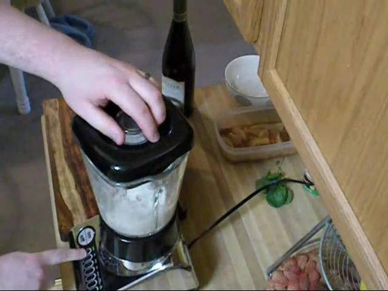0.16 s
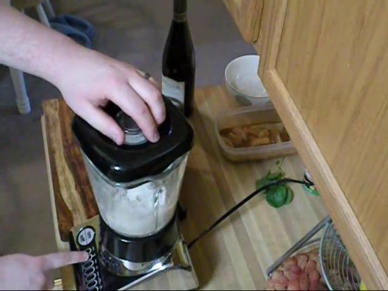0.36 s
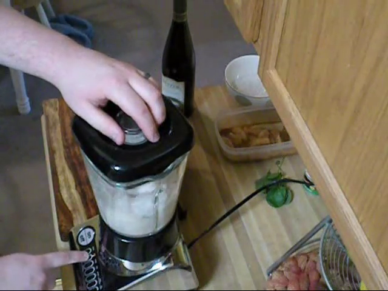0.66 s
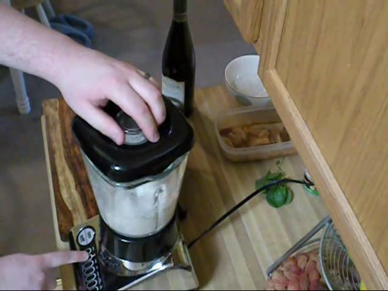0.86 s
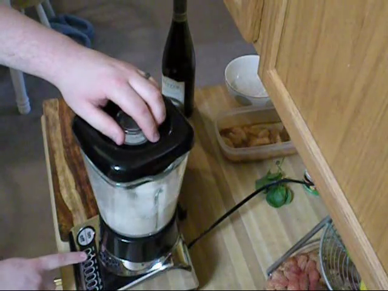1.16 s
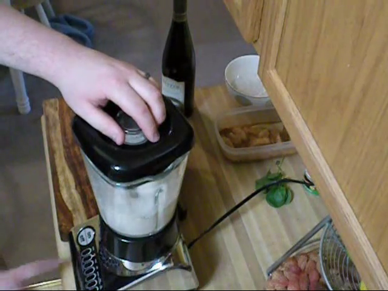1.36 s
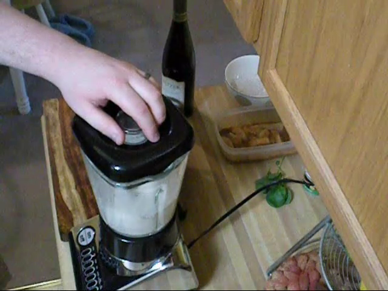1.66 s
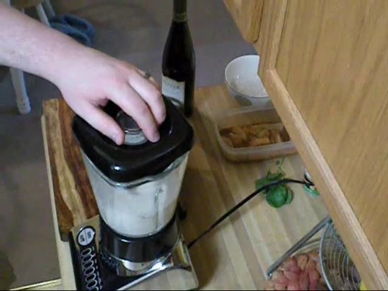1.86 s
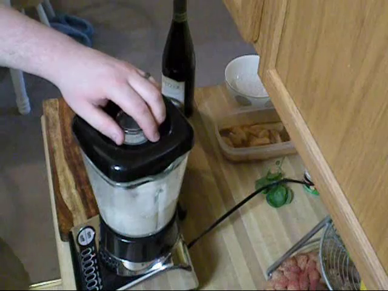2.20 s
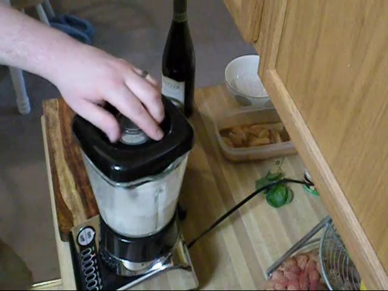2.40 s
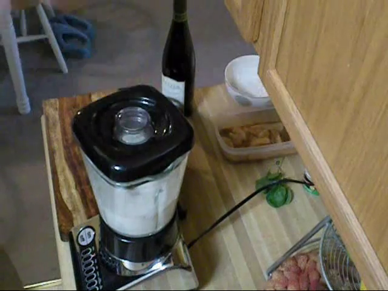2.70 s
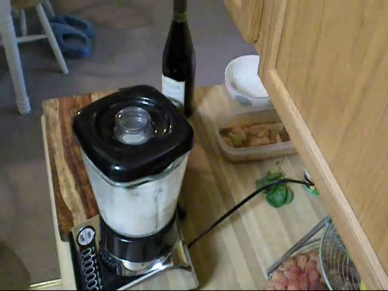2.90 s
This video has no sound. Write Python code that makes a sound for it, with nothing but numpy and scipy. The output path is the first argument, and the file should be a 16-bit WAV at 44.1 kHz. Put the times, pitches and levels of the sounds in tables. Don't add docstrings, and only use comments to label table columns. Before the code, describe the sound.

A blender sits quiet with faint plastic creaks, then a sharp button click starts its buzzing, rising whine; chunks rattle against the glass in a small kitchen, caught by a cheap, gritty camera microphone.

```python
import sys
import numpy as np
from scipy import signal
from scipy.fft import rfft, irfft
from scipy.io import wavfile
from scipy.ndimage import uniform_filter1d, map_coordinates

SR = 44100
rng = np.random.default_rng(int(sys.argv[2]) if len(sys.argv) > 2 else 0)


def dump_mix(stems):
    frames = np.atleast_2d(stems).T
    limited = np.clip(frames, -1, 1)
    pcm = np.round(limited * 32767).astype(np.int16)
    wavfile.write(sys.argv[1], SR, pcm)


def decibels_to_gain(level_db):
    exponent = np.asarray(level_db, float) / 20
    return 10 ** exponent


N = 134505
MAINS2_HZ = 120


def col(table, k, at, log=False):
    a = np.array(table, float)
    if log:
        return np.interp(np.log(at), np.log(a[:, 0]), a[:, k])
    return np.interp(at, a[:, 0], a[:, k])


def level(x, db):
    return x * decibels_to_gain(db) / np.sqrt(np.mean(x ** 2))


def walk(rate):
    k = int(SR / rate)
    held = np.repeat(rng.standard_normal(N // k + 1), k)
    return 1.035 * uniform_filter1d(uniform_filter1d(held, k), k)[:N]


def peak(x, hz, width):
    return signal.lfilter(*signal.iirpeak(min(hz, 4200), hz / width, SR), x)


def bands(table, slow_db, quick_db):
    f = np.arange(N // 2 + 1) * SR / N + 1
    swell = walk(6.37)
    noise = rfft(rng.standard_normal(N)) * decibels_to_gain(col(table, 1, f, True)) * (f < 4300)
    out = 0
    for hz in 40 * 2 ** np.arange(0, 7, .5):
        share = np.cos(np.clip(np.log2(f / hz) * np.pi, -np.pi / 2, np.pi / 2)) ** 2
        out = out + irfft(noise * share, N) * decibels_to_gain(slow_db * swell + quick_db * walk(20))
    return level(out, 0)


# f/Hz, level/dB (per Hz)
KITCHEN = [(29, -42), (50, -29.5), (296, -9), (330, -15.5), (362, -2.5), (412, -14.5), (443, -10),
           (2180, -19), (4000, -22.5), (5200, -53), (8800, -120)]


def kitchen():
    return decibels_to_gain(-46) * bands(KITCHEN, 1.9, 2.0)


# t/s, level/dB, length/s, f/Hz
HANDLING = [
    (.0701, -32.5, 0.01, 886),
    (.0702, -30, 0.011, 3050),
    (0.081, -40, 0.017, 2500),
    (.345, -44, .04, 2510),
    (0.522, -44, 0.0087, 1520),
    (0.564, -44.5, 0.046, 1090),
    (0.5715, -34.5, 0.017, 3540),
    (.618, -19, 0.012, 1960),
    (0.621, -12.5, 0.011, 2900),
    (0.624, -23, 0.011, 194),
]


def handling(t):
    out = np.zeros(N)
    for s, db, length, hz in HANDLING:
        u = np.clip(t - s, 0, None) / length
        grit = rng.standard_normal(N) * decibels_to_gain(4 * walk(600))
        burst = level(peak(grit, hz, .5 * hz), db)
        out += burst * (t > s) * np.minimum(u * 6, 1) * np.exp(-u)
    return out


# t/s, level/dB, rise/s, f/Hz
JOLTS = [(0.0724, -32.5, .003, 900), (0.6197, -6, 0.00079, 2880), (0.621, -12, .002, 3626),
         (.629, -12, 0.0049, 650), (0.6454, -10.5, 0.0049, 650), (0.666, -18.5, 0.0058, 650),
         (0.704, -13.5, .008, 640), (0.801, -13.5, .012, 645), (0.857, -13, 0.015, 661),
         (0.866, -15, 0.014, 1508), (0.938, -9.5, 0.0068, 660), (1.301, -15, 0.022, 1487)]


def jolts(t):
    out = np.zeros(N)
    for s, db, rise, hz in JOLTS:
        u = np.clip(t - s, 0, None) / rise
        turns = hz * t + rng.random()
        out += decibels_to_gain(db) * u * np.exp(1 - u) * np.sin(2 * np.pi * turns)
    return out


# f/Hz, width/Hz, level/dB
HOUSING = [(1186, 30, -6), (1232, 30, -13), (1305, 44, -4), (1403, 30, -.5), (1448, 36, 4.5),
           (1506, 36, 2.5), (1550, 24, .5), (1590, 24, -6), (1660, 80, -11)]


def housing(x):
    out = 0
    for hz, width, db in HOUSING:
        out = out + decibels_to_gain(db) * peak(peak(x, hz, 1.25 * width), hz, 1.25 * width)
    return out


# t/s, f/Hz, level/dB
WHINE = [(.64, 1310, -33), (.86, 1322, -29), (1.0, 1365, -28), (1.1, 1386, -23), (1.22, 1396, -23),
         (1.3, 1390, -25), (1.48, 1436, -21), (1.64, 1462, -22), (1.88, 1515, -20), (2.04, 1519, -20),
         (2.2, 1544, -20), (2.44, 1555, -20), (2.6, 1550, -20), (2.76, 1577, -19), (2.86, 1590, -20),
         (2.92, 1580, -19), (3.05, 1572, -19)]
# steps of twice the mains rate, level/dB
SIDEBANDS = [
    (-4, -14),
    (-3, -2),
    (-2, 0),
    (-1, 0),
    (0, 0),
    (1, -2),
    (2, -7),
]
# multiple of twice the mains rate, level/dB
BUZZ = [
    (1, -89.5),
    (2, -30),
    (3, -28.5),
    (5, -32.5),
    (7, -32),
]


def motor(t):
    hz = col(WHINE, 1, t) * (1 + 0.00093 * walk(30))
    turn = 2 * np.pi * np.cumsum(hz) / SR
    mains = 2 * np.pi * MAINS2_HZ * t
    whine = 0
    for k, db in SIDEBANDS:
        start = 2 * np.pi * rng.random()
        whine = whine + decibels_to_gain(db + 3.2 * walk(14)) * np.sin(turn + round(k) * mains + start)
    out = housing(decibels_to_gain(col(WHINE, 2, t)) * whine)
    brushes = rng.standard_normal(N)
    out += level(housing(brushes), -23.5)
    shaft = np.sin((turn - 2 * mains) / 12)
    out += decibels_to_gain(-41) * peak(shaft, 101, 6.5)
    for k, db in BUZZ:
        start = 2 * np.pi * rng.random()
        out += decibels_to_gain(db - 2.5 + 3.3 * walk(14)) * np.sin(round(k) * mains + start + 0.98 * walk(8))
    return out


def rings(table, push):
    out = 0
    for k, (hz, width, db) in enumerate(table):
        ring = level(peak(peak(push, hz, 1.37 * width), hz, 1.37 * width), 0)
        out = out + decibels_to_gain(db + 1.2 * walk(13)) * ring * (-1) ** k
    return out


# f/Hz, width/Hz, level/dB
JAR = [(230, 22.3, -4.5), (280.7, 31, -6.5), (388.5, 130, -1.5), (565, 46, -9.5), (613.4, 72, -2.5),
       (670.3, 50, -1.5), (899, 120, -2)]
# f/Hz, level/dB (per Hz)
CHURN = [(35, -53), (60, -44), (232, -6.5), (494, -9), (621, 5.5), (780, -5), (1470, -5), (1720, -7.5),
         (4000, -8.5), (5200, -19), (8800, -120)]
# f/Hz, width/Hz, level/dB
SPLASH = [(1849, 52, -10), (2277, 110, -8.5), (2720, 160, -6), (3612, 380, -2.5)]
# t/s, churn level/dB, rumble level/dB, knocking level/dB
LOAD = [
    (.62, -31.5, -18, -15),
    (.72, -27.5, -20.5, -3),
    (.76, -25, -22.5, 12),
    (.86, -24.5, -17.5, 3),
    (1.0, -20.5, -19.5, 6.5),
    (1.25, -21.5, -19.5, 3),
    (1.6, -20, -21, 5.5),
    (2, -19, -20.5, -4),
    (2.6, -21, -25, 3),
    (3.05, -21, -21.5, -0.5),
]


def mix(t):
    pulse = 1 + 0.13 * np.sin(2 * np.pi * MAINS2_HZ * t)
    push = rng.standard_normal(N) * decibels_to_gain(3.2 * walk(39.92)) * pulse
    rumble = level(rings(JAR, push), 0)
    churn = bands(CHURN, 0.23, 1.5) + decibels_to_gain(-7) * rings(SPLASH, push)
    return rumble * decibels_to_gain(col(LOAD, 2, t)) + churn * decibels_to_gain(col(LOAD, 1, t))


# t/s, peak level/dB
CHUNKS = [(0.7288, -18), (0.7472, -16), (0.7622, -14), (0.7916, -16), (0.8301, -14), (0.9667, -17),
          (1.0461, -13), (1.074, -16), (1.092, -16), (1.1344, -15), (1.1688, -16), (1.1917, -16),
          (1.2157, -15), (1.4137, -21), (1.4267, -17), (1.4586, -15), (1.5459, -16), (1.5908, -16),
          (1.723, -19), (1.7804, -15), (1.9375, -19), (2.0074, -18), (2.0653, -16), (2.1511, -17),
          (2.2753, -18), (2.4404, -20), (2.6145, -17), (2.7238, -16), (2.9916, -19), (3.0161, -15)]
# f/Hz, level/dB, t60/s (time to fade by 60 dB)
GLASS = [
    (650, -8.5, 0.076),
    (2740, -11.5, 0.0086),
    (3170, -11, 0.014),
    (3720, 2.5, 0.024),
    (3943, 2.5, 0.009),
]


def chunks(t):
    knocks_per_s = 320
    spread_db = 2 * np.minimum(rng.exponential(size=N), 2)
    knock_db = -26.5 + col(LOAD, 3, t) + 0.52 * walk(25) + spread_db
    hits = (rng.random(N) < knocks_per_s / SR) * decibels_to_gain(knock_db) * rng.choice([-1, 1], N)
    chance = rng.random((len(CHUNKS), 2, 2))
    for (s, db), c in zip(CHUNKS, chance):
        hits[int(s * SR)] += decibels_to_gain(db + 1.2)
        for k in range(2):
            bounce = int((s + .003 * (k + .5 + c[k, 0])) * SR)
            hits[min(bounce, N - 1)] -= decibels_to_gain(db - 2.0 - 6.5 * c[k, 1])
    u = np.arange(SR // 10) / SR
    ring = 0
    for hz, db, t60 in GLASS:
        ring = ring + decibels_to_gain(db) * np.exp(-np.log(1000) * u / t60) * np.sin(2 * np.pi * hz * u)
    return decibels_to_gain(-4) * signal.fftconvolve(hits, ring)[:N]


def room(x):
    t60_s, echo_db = 0.32, -10
    u = np.arange(SR // 2) / SR
    tail = rng.standard_normal(len(u)) * np.exp(-np.log(1000) * u / t60_s) * (u > .004)
    tail = tail / np.sqrt(np.sum(tail ** 2))
    return x + decibels_to_gain(echo_db) * signal.fftconvolve(x, tail)[:N]


def scene():
    t = np.arange(N) / SR
    start_s, rise_s = .622, 0.002
    on = np.clip((t - start_s) / rise_s, 0, 1)
    blender = room(on * (mix(t) + chunks(t)) + handling(t) + jolts(t))
    blender += on * motor(t)
    blender -= 0.96 * peak(blender, 1392, 23)
    blender = signal.sosfilt(signal.butter(2, 88.8, "high", fs=SR, output="sos"), blender)
    return (blender + kitchen())[None]


def roll_off(x):
    return signal.sosfilt(signal.butter(12, 15750, fs=SR, output="sos"), x)


def record(dry):
    camera_hz, step = 8001.55, .0078
    x = signal.sosfilt(signal.ellip(6, .5, 50, 3950, fs=SR, output="sos"), dry[0])
    places = np.arange(int(N * camera_hz / SR) + 2) * SR / camera_hz
    samples = map_coordinates(x, [places], mode="nearest")
    steps = np.floor(np.clip(samples, -.85, .85) / step) * step
    out = steps[(np.arange(N) * camera_hz / SR).astype(int)]
    out = signal.sosfilt(signal.ellip(10, .2, 80, 15700, fs=SR, output="sos"), out)
    return roll_off(out[None])


dry = scene()
out = record(dry)
dump_mix(out)
```